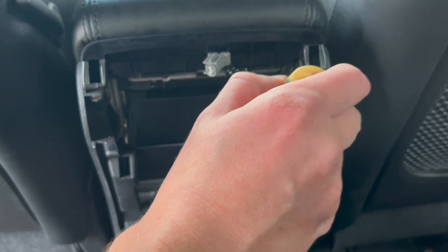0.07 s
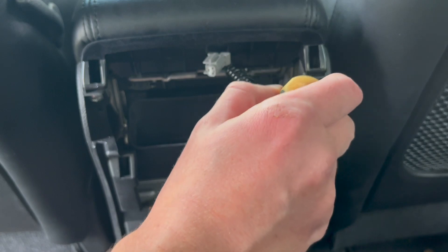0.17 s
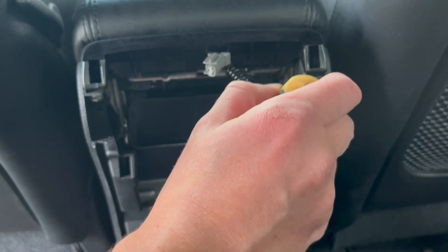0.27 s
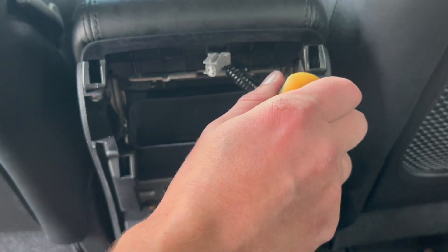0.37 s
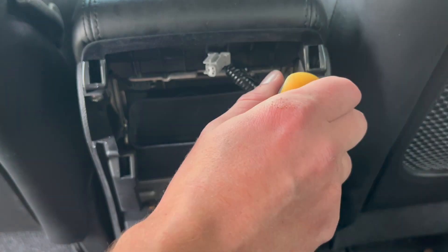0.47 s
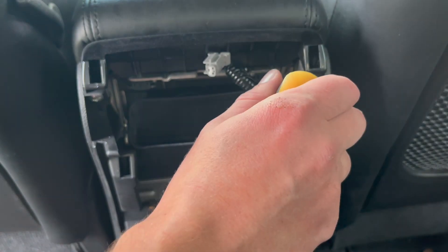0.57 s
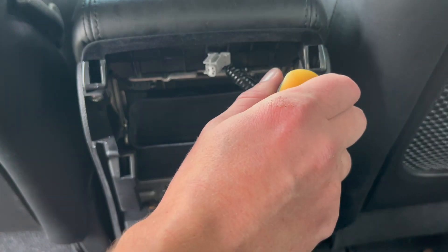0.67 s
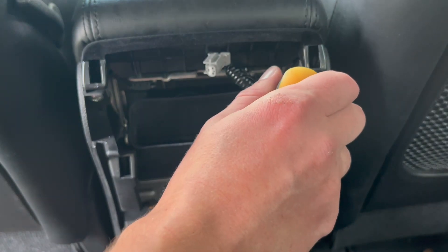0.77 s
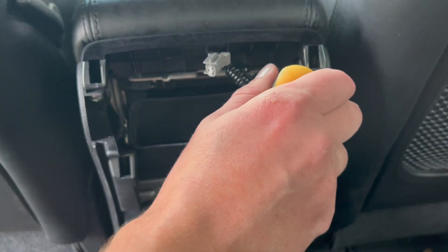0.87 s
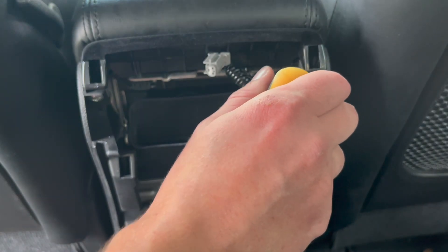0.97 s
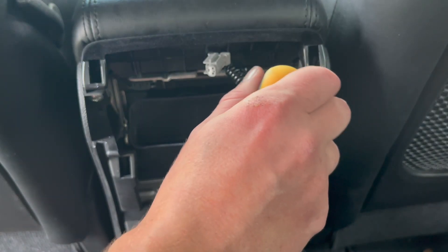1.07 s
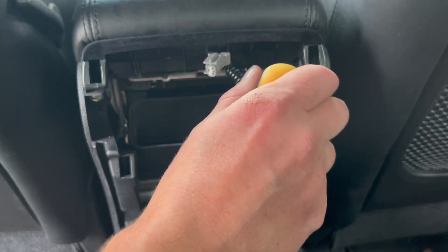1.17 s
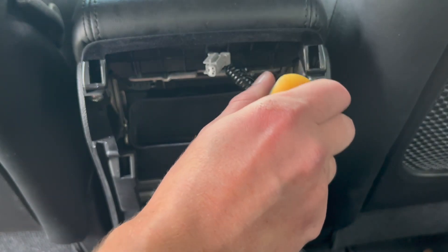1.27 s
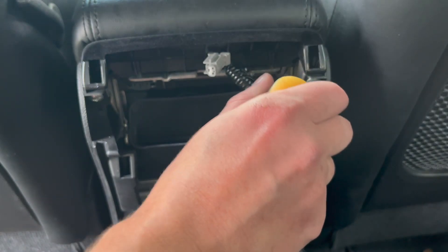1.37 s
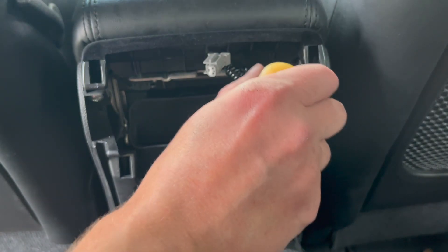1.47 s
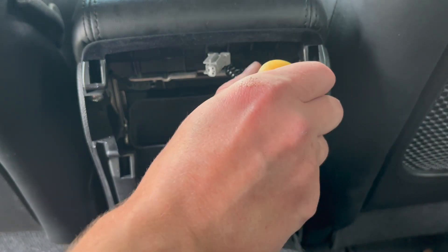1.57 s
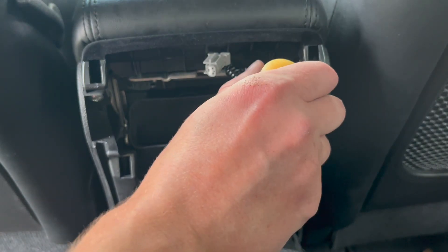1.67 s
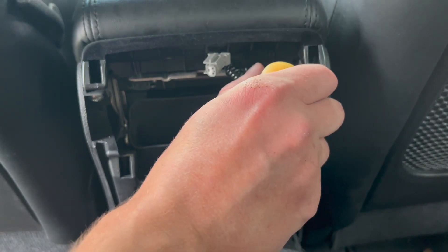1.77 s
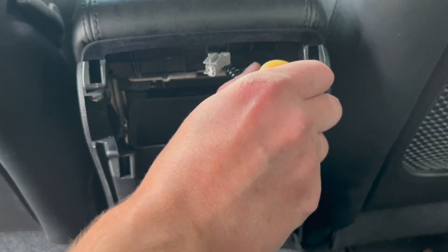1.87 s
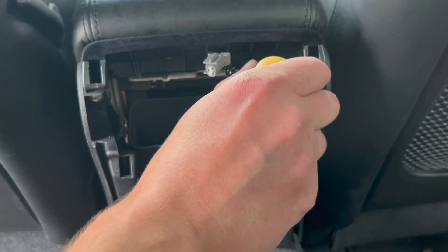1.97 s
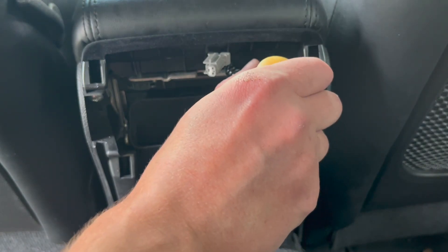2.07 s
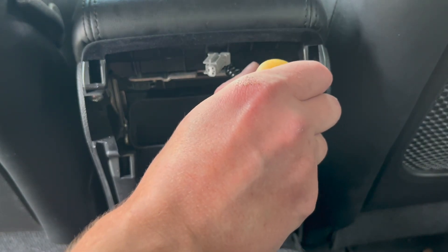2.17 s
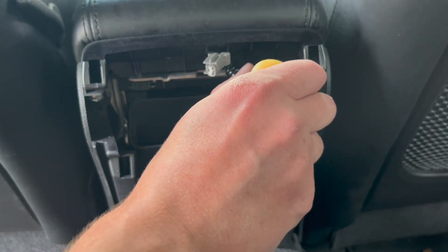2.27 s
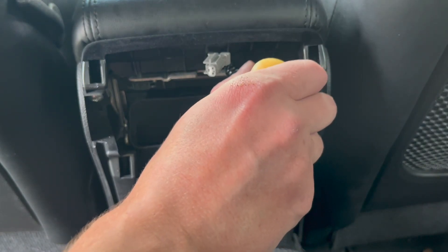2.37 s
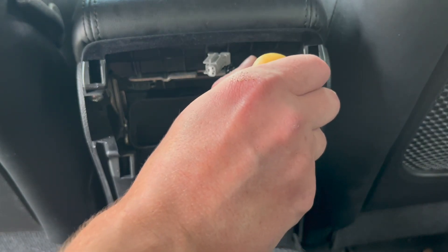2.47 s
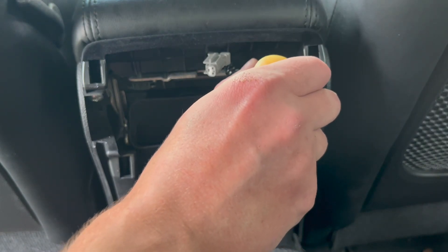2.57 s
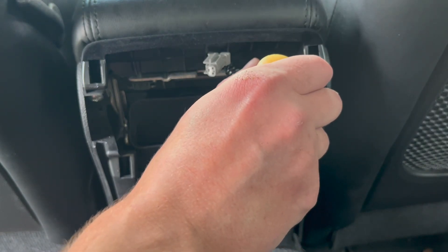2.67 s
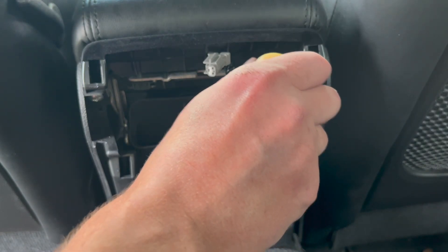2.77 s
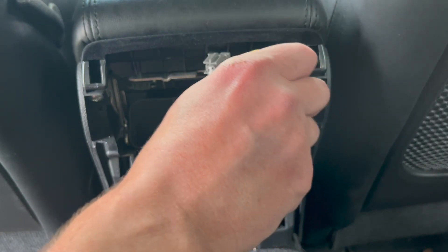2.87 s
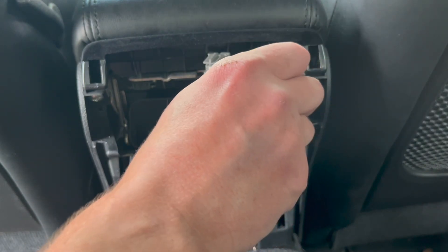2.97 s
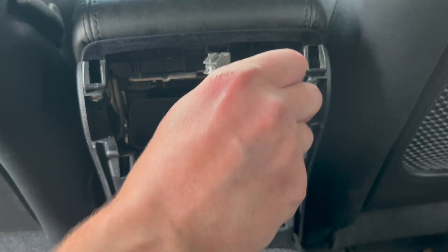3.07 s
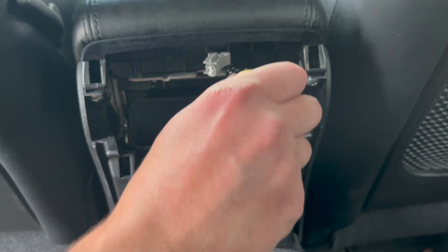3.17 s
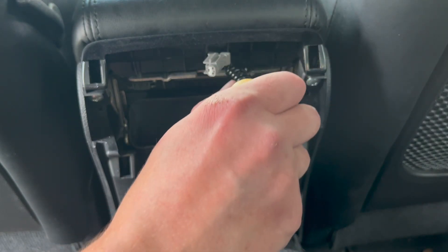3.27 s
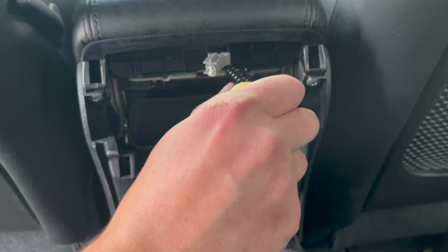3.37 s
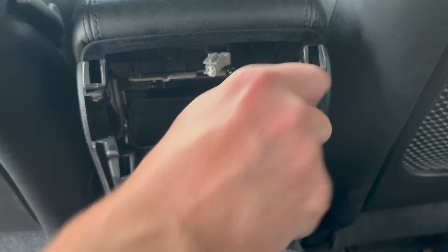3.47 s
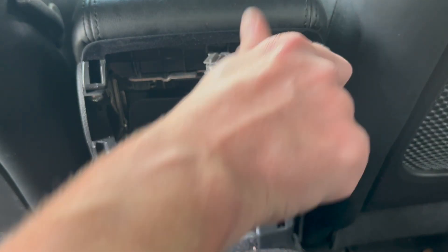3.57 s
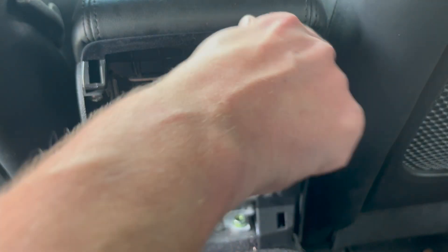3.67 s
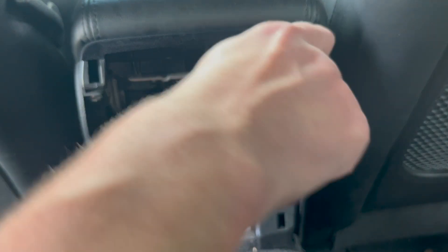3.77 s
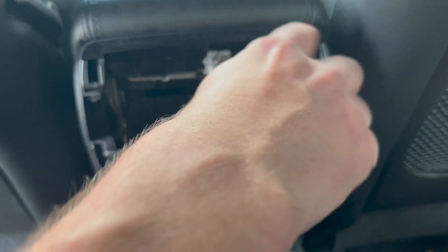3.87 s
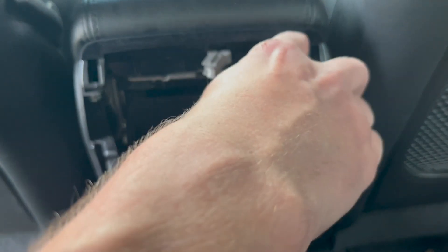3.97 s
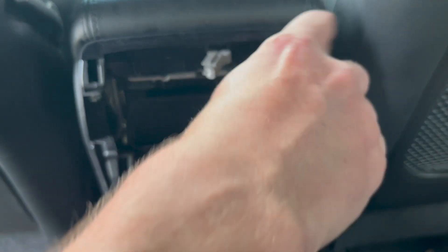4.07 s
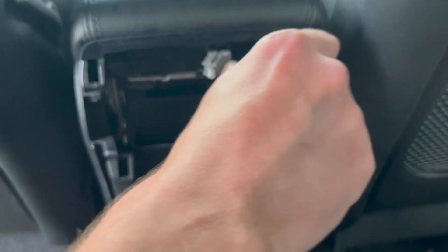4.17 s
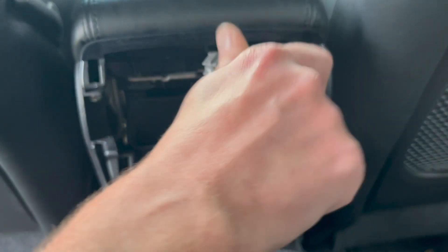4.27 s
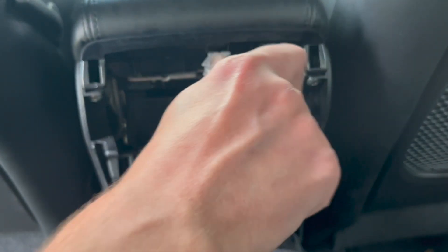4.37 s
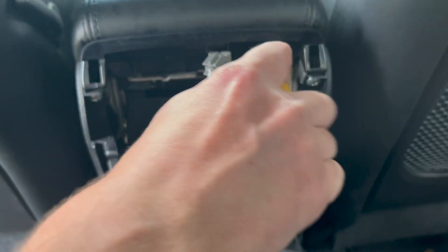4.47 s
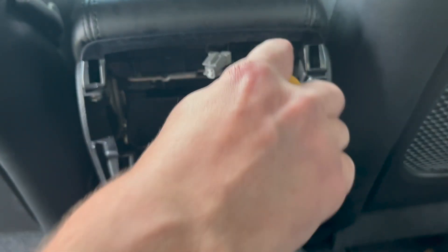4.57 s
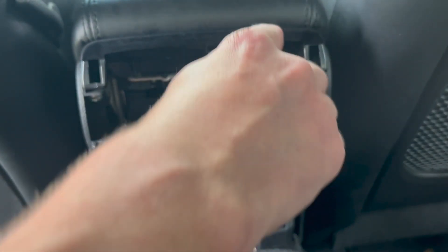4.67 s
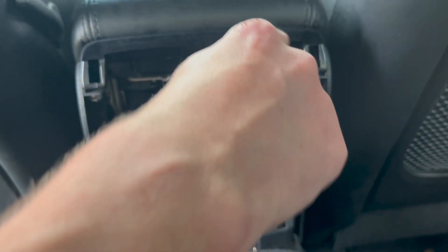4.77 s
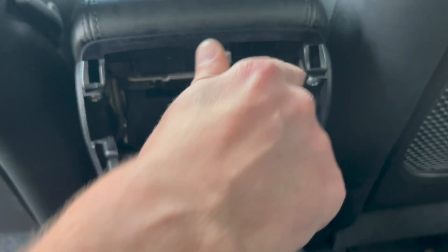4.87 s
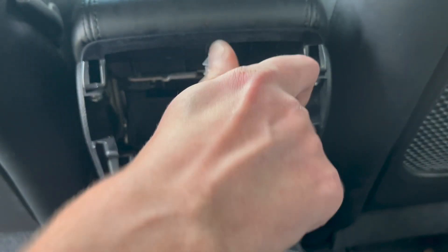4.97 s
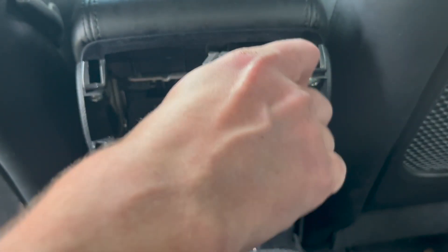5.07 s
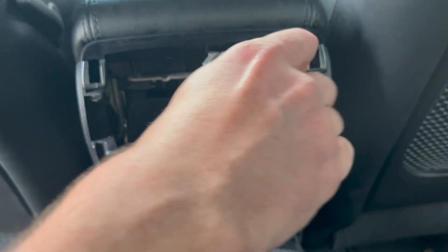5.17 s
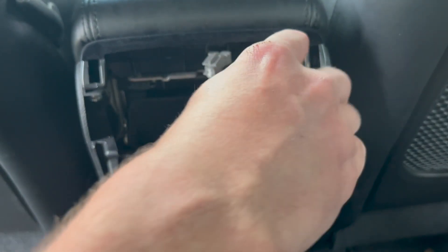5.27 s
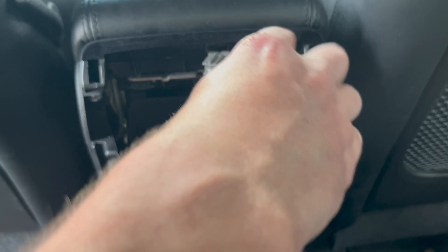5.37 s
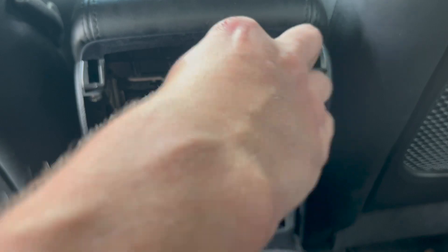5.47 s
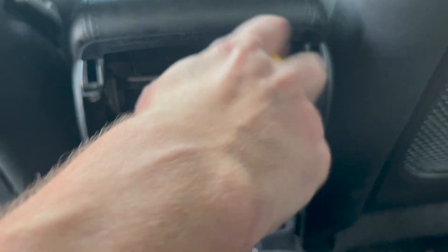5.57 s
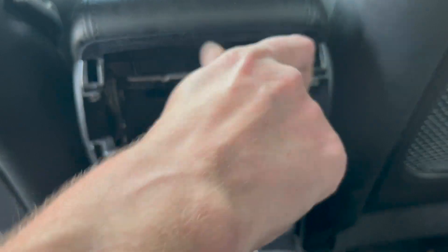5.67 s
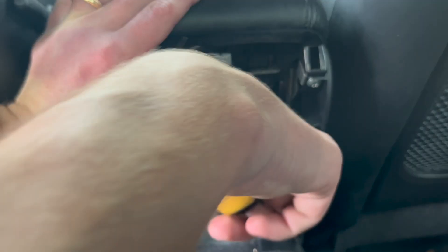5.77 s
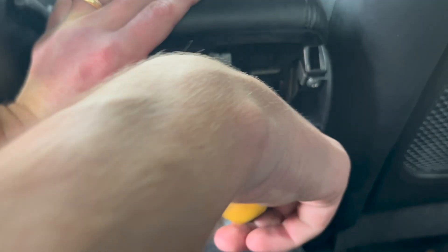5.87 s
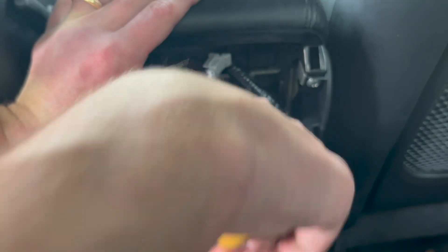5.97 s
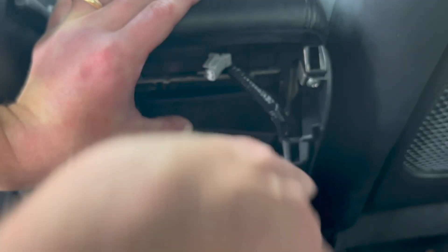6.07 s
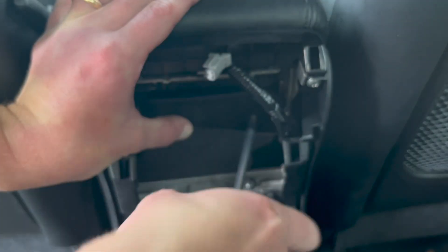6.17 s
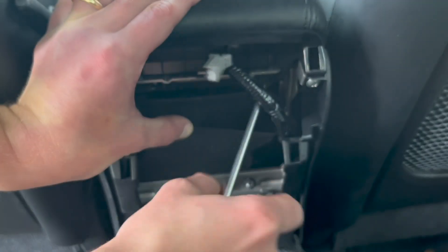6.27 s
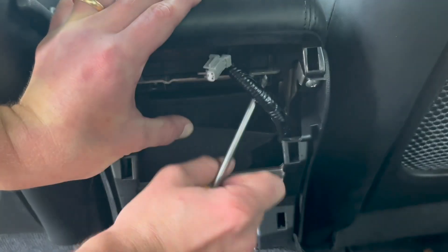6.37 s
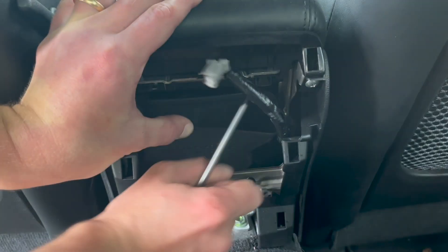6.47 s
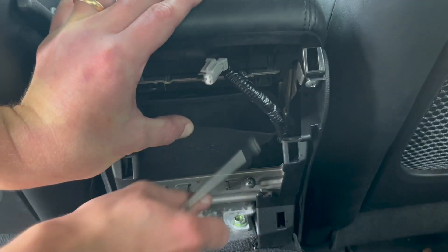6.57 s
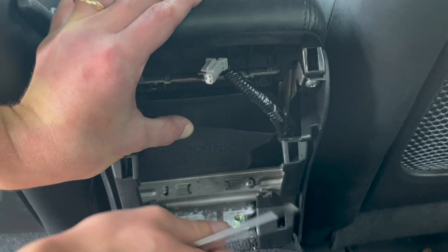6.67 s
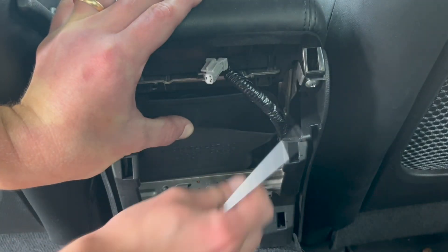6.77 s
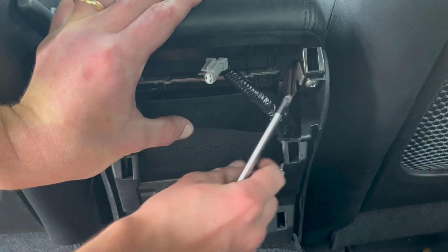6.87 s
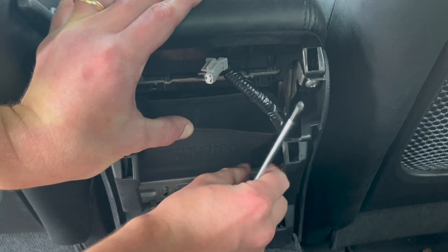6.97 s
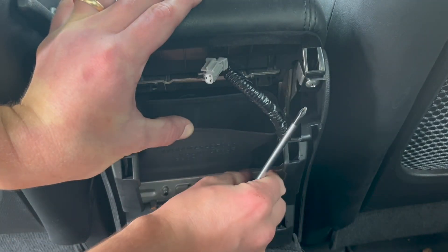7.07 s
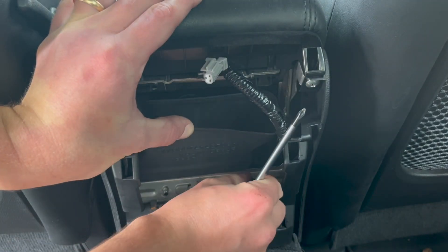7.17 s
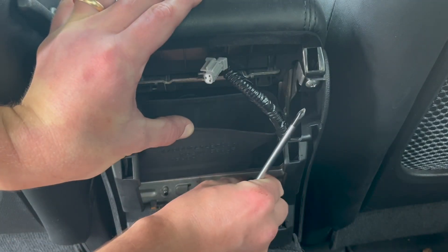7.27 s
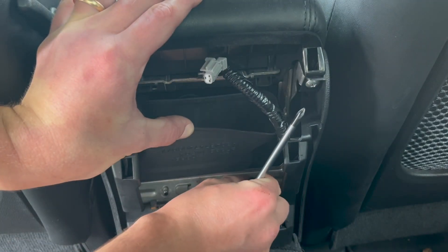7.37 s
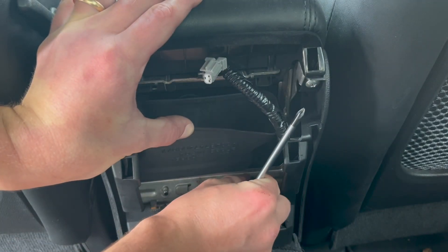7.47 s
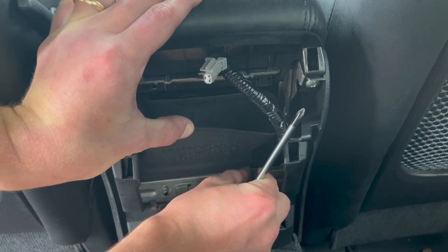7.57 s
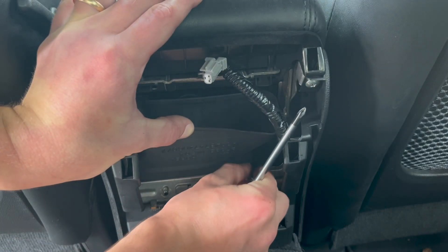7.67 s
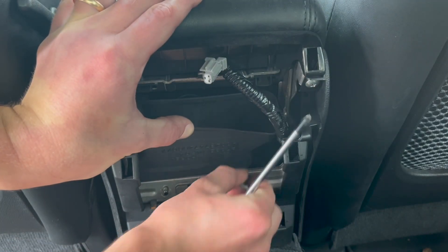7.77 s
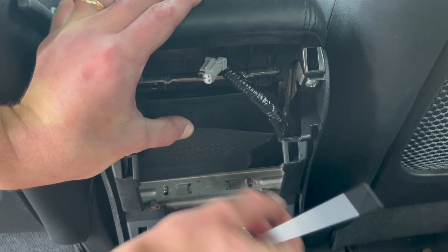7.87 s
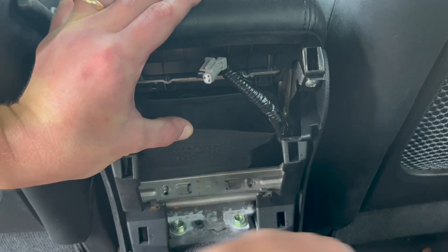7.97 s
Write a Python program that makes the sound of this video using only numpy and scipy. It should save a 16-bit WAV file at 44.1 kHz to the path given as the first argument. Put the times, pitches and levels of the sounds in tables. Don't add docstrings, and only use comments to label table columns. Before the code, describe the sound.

Close phone pickup in a small, dry car cabin. A deep engine boom near 50 Hz wavers and dips under soft fan air, strongest at the start. At 0 s the tool rubs and creaks, then snaps brightly at 0.2 with a dull thud. A tiny abrupt dropout falls near 0.4, after which the air is weaker. Small ticks and creaks follow at 0.8-1.4, then harder metallic slips with panel thuds at 1.7, 1.8, 2.2, 2.5, 3.25 and 3.35. Rubs and a heavy knock come at 3.7-3.9, a double knock at 4.4, a soft thud at 4.8 and a cluster at 5.5. A second brief dropout at 5.7 leaves a much fainter boom and scraping creaks. Quick loose clatter runs 6.2-6.55, lighter clicks and a thud 6.8-7.0, thin clear tinks around 7.5, a last thud at 7.75 and slight rising rustle.

```python
import sys
import numpy as np
from scipy import signal
from scipy.io import wavfile
from scipy.ndimage import uniform_filter1d

SR = 44100
rng = np.random.default_rng(int(sys.argv[2]) if len(sys.argv) > 2 else 0)


def dump(signal):
    limited = np.clip(np.atleast_2d(signal).T, -1, 1)
    pcm = np.round(limited * 32767).astype(np.int16)
    wavfile.write(sys.argv[1], SR, pcm)


def linear_from_db(decibels):
    return 10 ** (np.asarray(decibels, float) / 20)


N = 353064
SPAN = 8192
GRIP_DB = 2.0

# frequency in Hz, level in dB, t60 in s.
BIT_MODES = [(6718, 2, 0.042), (7470, 3, 0.04), (8230, -1, 0.07), (8900, -2, 0.064), (9700, -4, 0.05)]
# frequency in Hz, level in dB, t60 in s.
BRACKET_MODES = [(3515, -4, 0.053), (4150, 2.5, 0.028), (4950, -21, 0.02), (5400, -2, 0.047)]
# frequency in Hz, level in dB, t60 in s.
SCREW_MODES = [(10180, 0, .029), (11330, -3, .033), (11600, -10, .045), (12280, -3, .027),
               (12800, -9, .045), (13330, -15, .05), (14000, -7, .032)]
# frequency in Hz, level in dB, t60 in s.
CLACK_MODES = [(1580, 5, 0.033), (2300, -3.5, 0.052), (2480, -2, 0.057), (2880, -5, 0.074)]
# time in s, level in dB.
BOOM_LEVEL = [(0, -43), (1.2, -43.5), (1.75, -46), (2.3, -49), (3.4, -47.5), (4, -48), (4.6, -44),
              (5.6, -46), (5.85, -57), (6.1, -60.5), (6.9, -59), (7.4, -58.5), (8.01, -66)]
# start in s, end in s, fall time in s, return time in s.
DROPOUTS = [
    (.37345, .40292, .00001, .00001),
    (5.7106, 5.7362, .0012, .002),
]


def band_noise(lo_hz, hi_hz, size):
    band = signal.butter(2, [lo_hz, min(hi_hz, .45 * SR)], "band", fs=SR, output="sos")
    x = signal.sosfilt(band, rng.standard_normal(size))
    return x / np.std(x)


def walk(rate):
    k = int(SR / rate)
    held = np.repeat(rng.standard_normal(N // k + 1), k)
    return 1.36 * uniform_filter1d(uniform_filter1d(held, k), k)[:N]


def over_time(curve):
    return np.interp(np.arange(N) / SR, *np.transpose(curve))


def low_pass(x, top_hz):
    return signal.sosfilt(signal.ellip(6, .3, 40, top_hz, fs=SR, output="sos"), x)


def load_db():
    return .8 * (over_time(BOOM_LEVEL) + 43)


def air(engine_db, fan_db, hiss_db):
    # frequency in Hz, density in dB per Hz.
    spectrum = [(25, -84), (50, -76), (100, -82.5), (160, -93.5), (520, -102), (3950, -132), (7000, -127),
                (15000, -128.5)]
    hz_points, density_db = np.transpose(spectrum)
    out, swell = 0, walk(1.8)
    for hz in 25 * 2 ** np.arange(0, 9.4, 1 / 3):
        db = np.interp(np.log(hz), np.log(hz_points), density_db) + 10 * np.log10(hz / 4)
        if hz < 130:
            db = db + 0.32 * engine_db
        elif hz < 3000:
            flow_share = min(hz / 800, 1, (1950 / hz) ** 7.2)
            db = db + flow_share * fan_db + 0.37 * swell + 1.5 * walk(9)
        else:
            db = db + hiss_db
        out = out + linear_from_db(db - 0.5) * band_noise(hz / 1.16, hz * 1.108, N)
    return low_pass(out, 14200)


def engine():
    # time in s, depth in dB.
    lulls = [(0.29, -3.5), (0.51, -6), (0.81, -3.5), (1.12, -5.5), (1.43, -18), (1.58, -4.5), (1.93, -11.5),
             (2.22, -9), (2.42, -5.5), (2.749, -8.5), (3.08, -9), (3.36, -25), (3.47, -8), (3.64, -9),
             (3.77, -3), (4.0, -6), (4.26, -4.5), (4.56, -7), (4.86, -5.5), (5.19, -10.5), (5.35, -12.5),
             (5.48, -4.5), (5.64, -11), (5.99, -20), (6.231, -21), (6.77, -14), (7.19, -11), (7.34, -7),
             (7.73, -14)]
    # multiple of the idle rate, level in dB.
    idle_orders = [(3, -66.5), (6, -62), (7, -66.5), (12, -77.5)]
    # multiple of its rate, level in dB.
    slow_orders = [(6.3, -67.5), (7, -70), (13, -68.5), (15, -66), (17, -69)]
    idle_hz, slow_hz = 12.55, 6.46
    boom_hz, late_boom_hz = 52.2, 51.4
    past_crest, past_zero = .45, .35
    lull_s = 0.029
    return_db, return_s = -13, .009

    t = np.arange(N) / SR
    phase = 2 * np.pi * np.cumsum(np.where(t < DROPOUTS[1][1], boom_hz, late_boom_hz)) / SR
    cut, back = (int(edge * SR) for edge in DROPOUTS[0][:2])
    before = t < np.mean(DROPOUTS[0][:2])
    phase -= np.where(before, phase[cut] - past_crest, phase[back] - np.pi / 2 - past_zero)
    boom_db = over_time(BOOM_LEVEL)
    boom_db += sum(db * np.exp(-((t - s) / lull_s) ** 2) for s, db in lulls)
    boom_db += return_db * np.exp(-abs(t - DROPOUTS[0][1]) / return_s)
    out = np.sqrt(2) * linear_from_db(boom_db + 0.93 * walk(9.8)) * np.cos(phase + 0.074 * walk(8.5))

    orders = [(k * idle_hz, db, k % 6 == 0) for k, db in idle_orders]
    orders += [(k * slow_hz, db, False) for k, db in slow_orders]
    load = load_db()
    for hz, order_db, firing in orders:
        share = .15 if firing else 1
        turn = 2 * np.pi * hz * t + 0.82 * walk(3)
        out += np.sqrt(2) * linear_from_db(order_db + share * load + 0.56 * walk(4)) * np.sin(turn)
    return out


def gripped(modes, share):
    return [(hz, db, t60 * share) for hz, db, t60 in modes]


def ring(modes, scatter_db, edges_hz, dense_db, dense_t60, rise_ms=0.027, detune=0.0092, size=SPAN // 2):
    t = np.arange(size) / SR
    hz, db, t60 = np.transpose(modes)[:, :, None]
    chance = rng.standard_normal((2, len(modes), 1))
    hz = np.minimum(hz * (1 + detune * chance[1]), .45 * SR)
    lines = linear_from_db(db + scatter_db * chance[0]) * np.sin(2 * np.pi * hz * t) * linear_from_db(-60 * t / t60)
    wash = linear_from_db(dense_db - 60 * t / dense_t60) * band_noise(*edges_hz, size)
    rise = 1 - np.exp(-(t * 1000 / max(rise_ms, .01)) ** 2)
    return (lines.sum(axis=0) + wash) * rise


def chatter(ms, soft, grain_db, lead_db=-19.5):
    u = np.arange(SPAN) / SR / (max(ms, .2) / 1000)
    shape = np.sin(np.pi * np.clip(u, 0, 1)) if soft else np.exp(-u ** 2 * 2)
    train = shape * rng.standard_normal(SPAN) * linear_from_db(grain_db * rng.exponential(size=SPAN))
    return train / np.sqrt(np.sum(train ** 2)) + linear_from_db(lead_db) * (u == 0)


def add(out, s, push, response, db):
    y = signal.fftconvolve(push, response)[:SPAN]
    top = np.sqrt(uniform_filter1d(y ** 2, size=176).max())
    i = int(max(s, 0) * SR)
    out[i:i + SPAN] += (y * linear_from_db(db) / top)[:N - i]


def rubs():
    # start in s, level in dB, length in ms, screw share in dB, plastic share in dB.
    strokes = [(0.0, -53, 30, -28, -10), (0.006, -56, 46, -33, -12), (0.796, -71, 42, -27, 2),
               (1.185, -75, 58, -8, -10), (1.209, -62.5, 63, -23, -10.5), (1.233, -69.5, 36, -19, -9),
               (1.402, -60, 53.6, -22, -11.5), (1.739, -75, 69, -15, -3), (1.948, -78.5, 71, -17, -10),
               (2.089, -69.5, 18, -24, -7), (2.151, -76.5, 56, -16, -25), (2.35, -65, 39, -22, -16),
               (3.701, -67, 57, -17, -3.5), (3.723, -59, 36, -9, -36), (3.85, -68.5, 30, -10, -28),
               (3.872, -60, 32.4, -29, -1.5), (4.375, -85, 43, -14, -2), (5.329, -85, 22, -5, -20),
               (5.364, -80.5, 36, -3, -18), (5.547, -82.5, 73, -4, -14), (5.845, -73, 22, -18, -12),
               (6.2, -86, 40, 2, -23), (6.244, -74.5, 82, -4, 2), (6.9, -82, 99, -6, -20),
               (6.49, -84, 30, -3, -8), (6.54, -80, 30, -5, -6), (7.68, -87, 46, -4, -20)]
    out = np.zeros(N)
    for s, db, ms, screw_db, clack_db in strokes:
        held = np.repeat(rng.standard_normal(SPAN // 128), 128)
        clumps = linear_from_db(4.5 * uniform_filter1d(held, 96))
        push = chatter(ms, s > .01, 3.8) * clumps
        bracket_db = db + 0.33 * clack_db - 4.0
        add(out, s, push, ring(gripped(BIT_MODES, 0.55), 2.5, (5800, 10500), 6, 0.022), db)
        bracket = ring(gripped(BRACKET_MODES, 0.63), GRIP_DB, (3400, 6200), 6, 0.042)
        add(out, s, push, bracket, bracket_db)
        add(out, s, push, ring(SCREW_MODES, 8.5, (10000, 13500), 4.1, 0.0081), db + screw_db)
        add(out, s, push, ring(CLACK_MODES, 1.3, (1500, 3600), 5.7, 0.028), db + clack_db)
    return out


def creaks():
    # start in s, level in dB, length in ms, pitch in Hz, brush in dB.
    squeaks = [(0.0, -54, 46, 1660, -1), (.04, -62.5, 127, 644, -2), (.2, -66, 270, 726, 2),
               (0.2, -72.5, 174, 1317, -9), (.05, -74, 180, 1690, -2), (.2, -75.5, 160, 1743, -4),
               (.06, -73, 140, 1310, -6), (.07, -81, 120, 6100, 5), (.24, -81, 140, 6150, 5),
               (1.418, -66, 29, 4300, 4), (1.5, -76, 79, 852, -14), (.805, -64.5, 87, 883, -13),
               (0.799, -81, 100, 1920, 3), (1.42, -75, 120, 867, -13), (1.5, -81, 94, 2080, -2),
               (2.26, -76, 120, 830, -8), (2.261, -76.5, 88, 1720, 9), (2.551, -78.5, 104, 1910, -1),
               (2.57, -68.5, 44.4, 804, -7), (4.39, -58.5, 25, 526, -6), (5.041, -71.5, 90, 441, -15),
               (5.773, -63.5, 60, 972, -24.5), (5.8, -84, 89, 2490, -8), (5.76, -82, 120, 2900, 10),
               (5.75, -80, 130, 1800, 10), (5.772, -80, 40, 2960, -6), (5.89, -87.5, 57, 2800, -8),
               (6.0, -86, 35, 2165, -8), (6.02, -81, 40, 1610, -2), (6.01, -77, 38, 830, -8),
               (6.03, -87, 110, 2480, -8), (5.9, -80, 180, 1700, 12), (.8, -80, 110, 2500, 12),
               (2.27, -80, 90, 2400, 12), (2.55, -81, 110, 2400, 12), (6.815, -72, 20, 2250, 0),
               (6.86, -78, 25, 2250, 2), (6.075, -83.5, 39, 1280, 0), (6.549, -54, 14, 474, -3.5),
               (6.894, -78, 24, 9800, 9), (7.465, -87, 17, 7400, -15)]
    sag_per_s = .33
    out = np.zeros(N)
    for s, db, ms, hz, brush_db in squeaks:
        over_db = -31 - 0.85 * brush_db
        modes = [(hz, 0, .045 - 0.0016 * brush_db), (2.55 * hz, over_db + 2.0, .07), (3.04 * hz, over_db + 3, .05)]
        push = chatter(ms, s > 0, 2.33)
        since = np.arange(SPAN) / SR - ms / 2000
        note = np.sin(2 * np.pi * hz * since * (1 - sag_per_s * since / 2))
        note = uniform_filter1d(abs(push), size=300) * note
        push = push + linear_from_db(min(-29 - brush_db, -15)) * note
        add(out, s, push, ring(modes, 0.42, (0.78 * hz, 1.23 * hz), brush_db, 0.048, detune=0), db)
    return out


def knocks():
    # start in s, first mode in dB, second mode in dB, upper modes in dB, contact in ms.
    blows = [(1.266, -55, -61, -85, 3.6), (3.549, -79, -68, -82, 4.3), (3.709, -59, -93, -79, 41),
             (3.746, -65.5, -91, -90, 2.1), (3.886, -47, -51, -57.5, 9.7),
             (4.371, -54.5, -61.5, -66.5, 7.9), (4.386, -57, -67, -73, 2.7), (5.539, -50, -58.5, -72, 6.8),
             (5.553, -60, -63.5, -68, 8.1), (5.577, -61.5, -64.5, -74, 4.8), (5.699, -73.5, -70, -104, 11),
             (6.247, -53, -73, -69.5, 7.4), (6.278, -59, -67, -79, 4.5), (6.299, -67, -73, -86, 3.9),
             (6.309, -68, -77, -76, 3.8), (6.33, -67, -77, -84, 7.1), (6.383, -58.5, -56.5, -64, 9)]
    # start in s, level in dB.
    tinks = [
        (7.4975, -67),
        (7.557, -57),
        (7.572, -69),
    ]
    # frequency in Hz, level in dB, t60 in s.
    held_shaft = [(552, 0, .036), (1550, 0, .03), (2665, 0, .032), (4172, -6, .035), (5600, -14, .03)]
    # frequency in Hz, level in dB, t60 in s.
    free_shaft = [(3224, -5, 0.13), (5200, -13, 0.038), (6780, -6, 0.06), (7690, -17, 0.074),
                  (8560, -7, 0.09), (9150, -6, .035), (10050, -4, 0.11)]
    out = np.zeros(N)
    for s, first_db, second_db, upper_db, ms in blows:
        push = chatter(6.2, False, 1.1, lead_db=-3.0)
        groups = (held_shaft[:1], first_db + 3.5), (held_shaft[1:2], second_db), (held_shaft[2:], upper_db)
        for modes, db in groups:
            edges_hz = .8 * modes[0][0], 1.2 * modes[-1][0]
            add(out, s - .003, push, ring(modes, .8, edges_hz, -11.0, .032, rise_ms=.9 * ms), db)
    for s, db in tinks:
        push = chatter(2.9, False, 1.5, lead_db=6.0)
        body = ring(free_shaft, 0.37, (4000, 11000), -9.0, 0.03, detune=0, size=SPAN)
        add(out, s, push, body, db - 6.5)
    return out


def thuds():
    # start in s, panel level in dB, panel frequency in Hz, ribs level in dB, chatter in ms.
    blows = [(0.005, -56, 520, -64, 20), (0.182, -48, 480, -54, 23), (0.964, -51, 480, -60, 10),
             (1.193, -54, 310, -66, 4.3), (1.264, -47, 546, -61.5, 2.6), (1.589, -68, 327, -68.5, 3.7),
             (1.695, -49, 353, -56, 9), (1.783, -43, 548, -59, 10.6), (2.09, -56, 350, -61, 19),
             (2.209, -43.5, 565, -49, 8), (2.533, -47.5, 350, -53, 7.2), (2.62, -58.5, 288, -71, 4.4),
             (3.244, -56.5, 334, -50, 12), (3.355, -45, 565, -53.5, 4.1), (3.461, -52, 364, -87, 8.2),
             (4.076, -50.5, 344, -91, 12), (4.828, -61.5, 415, -72, 7), (6.381, -43.5, 460, -57, 13.4),
             (6.484, -51.5, 552, -77, 8.6), (6.537, -43.5, 520, -58, 11), (6.822, -60.5, 564, -91, 3.9),
             (6.999, -44, 398, -77, 10.4), (7.755, -49, 398, -70, 12.4)]
    # frequency in Hz, level in dB, t60 in s.
    rib_modes = [(830, 1.5, 0.069), (892, -6.5, 0.046), (1113, 7, 0.043), (1423, -7.5, 0.11)]
    out = np.zeros(N)
    for s, db, hz, ribs_db, ms in blows:
        push = chatter(ms, False, 1.6, lead_db=-6.0)
        panel = ring([(hz, 0, .045)], 0, (0.62 * hz, 1.45 * hz), -8, 0.054, rise_ms=3.4)
        add(out, s - .002, uniform_filter1d(push, size=24), panel, db - 6.5)
        add(out, s - .002, push, ring(rib_modes, GRIP_DB, (700, 1700), -2.3, 0.087, rise_ms=0.59), ribs_db)
    return out


def cracks():
    # start in s, then bit, bracket, screw and
    # plastic clack levels in dB.
    slips = [(0.1808, -37, -47.5, -75, -52), (0.8118, -60, -99, -93, -100), (1.6875, -35, -55, -45.5, -66),
             (1.7833, -55, -65, -74, -59), (2.2088, -38, -51.5, -48.5, -57), (2.5323, -54, -83, -77, -88),
             (3.242, -35.5, -46, -31, -70.5), (3.3551, -50, -62, -63, -84), (3.5267, -58, -78, -69, -82),
             (3.8775, -42, -66, -61, -69), (4.368, -57.5, -67, -83, -76), (4.3819, -64, -74, -88, -61),
             (5.5239, -67, -83, -77, -68), (5.5366, -47, -67, -99, -71), (5.5542, -58, -62, -81, -74),
             (6.241, -54, -66.5, -65, -73), (6.2758, -54, -84, -82, -76), (6.3086, -67, -83, -80, -70),
             (6.3801, -38.5, -51.5, -62, -50.5), (6.4832, -54, -78, -66, -61.5),
             (6.5358, -55, -61.5, -65, -53), (6.8174, -54, -60, -68, -64.5), (6.8624, -59, -69, -72, -76),
             (7.7579, -56.5, -67, -86, -90)]
    # start in s, bit level in
    # dB, screw level in dB.
    more_slips = [(0.9647, -62.5, -69), (1.1942, -75, -82), (1.587, -71.5, -89), (2.0864, -60, -78),
                  (2.611, -66, -88), (3.4527, -67.5, -83), (3.6386, -69, -81), (4.051, -68.5, -81),
                  (5.698, -64, -92), (6.296, -64, -72), (6.326, -62, -79), (6.4783, -57, -70),
                  (1.2167, -60, -75), (1.409, -60, -80), (6.7095, -79, -89), (6.8806, -64, -72),
                  (6.9198, -87, -56.5), (6.9855, -63.5, -69), (6.997, -59, -82)]
    loose_s, loose_share = 5.9, .74
    snap_db, snap_t60_s = -9, .014
    wash_db = 4.5
    out, size = np.zeros(N), SPAN // 8
    more_rows = [(s, db, db - 14, screw_db, db - 16) for s, db, screw_db in more_slips]
    for s, bit_db, bracket_db, screw_db, clack_db in sorted(list(slips) + more_rows):
        ms = 5.47 + 0.05 * (bit_db + 51)
        ms *= loose_share if s > loose_s else 1
        push = chatter(ms, False, 7.0, lead_db=10.0)
        free = np.clip(ms / 6, .3, 1.2)
        bit = ring(gripped(BIT_MODES, free), GRIP_DB, (6000, 10500), wash_db, 0.042 * free)
        add(out, s, push, bit, bit_db - 10.0)
        snap = linear_from_db(-60 * np.arange(size) / SR / snap_t60_s) * band_noise(1800, 14500, size)
        add(out, s, push, snap, bit_db + snap_db - 10.5)
        bracket = ring(gripped(BRACKET_MODES, free), GRIP_DB, (3400, 6200), wash_db, 0.056 * free)
        add(out, s, push, bracket, bracket_db - 5)
        screw = ring(gripped(SCREW_MODES, free), 2.1, (9500, 14600), -1.9, 0.049 * free, detune=0.00081)
        add(out, s, push, screw, screw_db - 4.5)
        clack = ring(gripped(CLACK_MODES, free), GRIP_DB, (1500, 3500), wash_db, 0.032 * free)
        add(out, s, push, clack, clack_db)
    return out


def scene():
    # time in s, level in dB.
    flow = [
        (0, 14.5),
        (.37, 11),
        (.41, 2.5),
        (1.5, 3.5),
        (2.7, 0.5),
        (5.7, 0.5),
        (5.74, -2.5),
        (8.01, -4),
    ]
    stretch_hiss = 2, 0.13, 0.7
    t = np.arange(N) / SR
    stretch = np.searchsorted([edge[1] for edge in DROPOUTS], t)
    rustle_db = 10.5 * np.maximum(t - 7.6, 0)
    hiss_db = np.array(stretch_hiss)[stretch] + rustle_db
    tool = cracks() + thuds() + knocks() + rubs() + creaks()
    return (tool + engine() + air(load_db(), over_time(flow), hiss_db))[None]


def band_limit(x):
    return signal.sosfilt(signal.butter(12, 16520, fs=SR, output="sos"), x)


def record(dry):
    t = np.arange(N) / SR
    gates = [np.clip(np.maximum((start - t) / fall, (t - end) / back), 0, 1)
             for start, end, fall, back in DROPOUTS]
    mix = low_pass(dry, 16000) * np.prod(gates, axis=0)
    return band_limit(mix)


dry = scene()
out = record(dry)
dump(out)
```